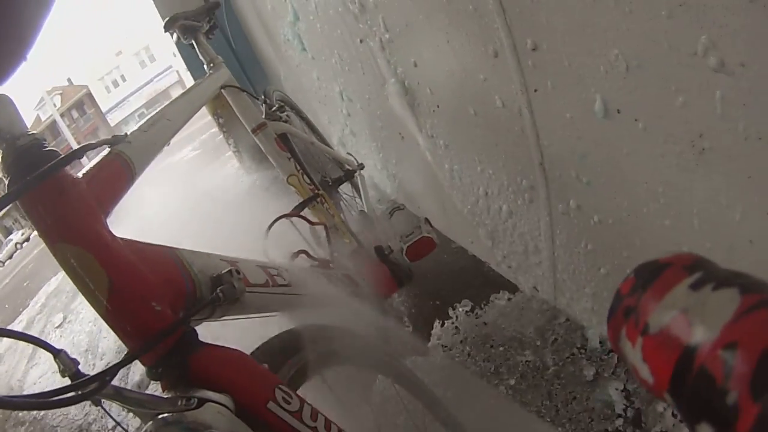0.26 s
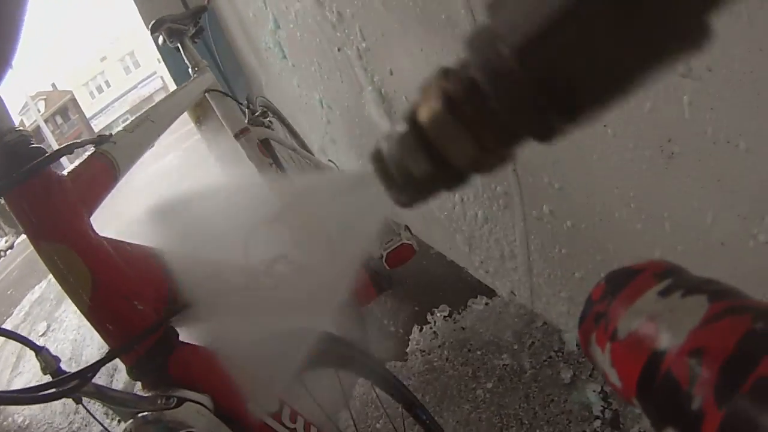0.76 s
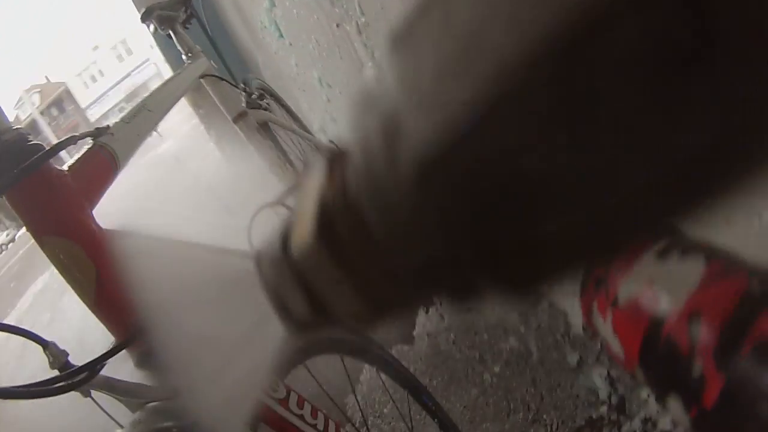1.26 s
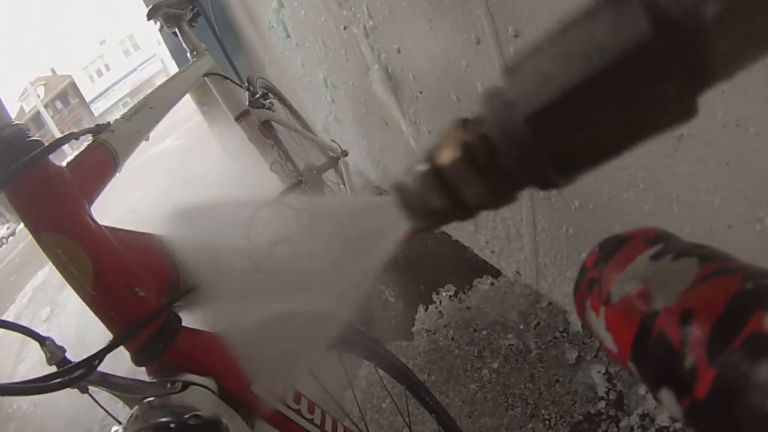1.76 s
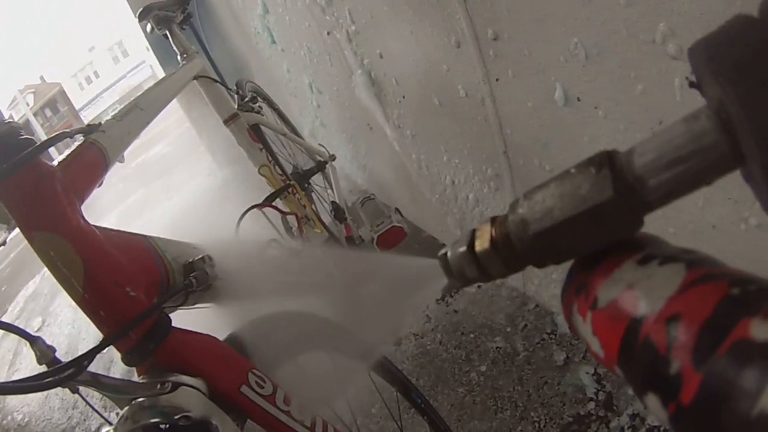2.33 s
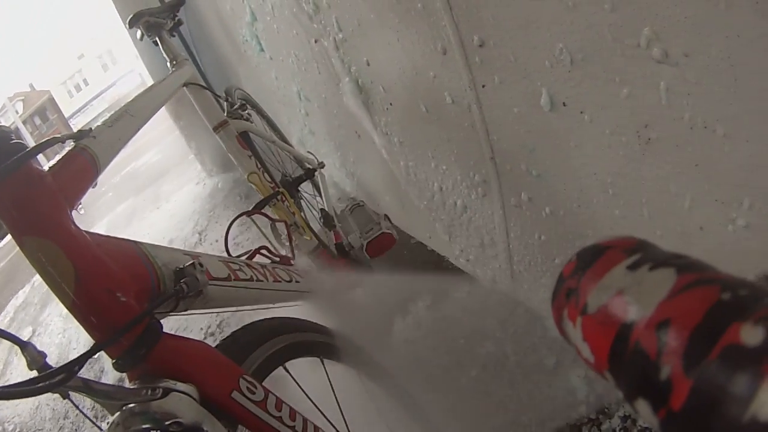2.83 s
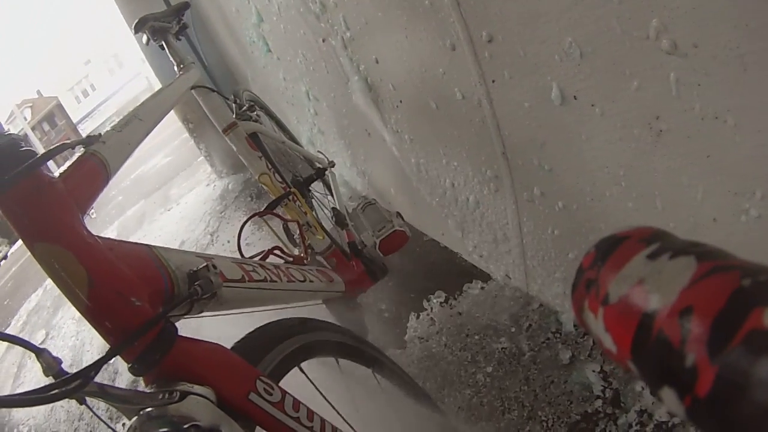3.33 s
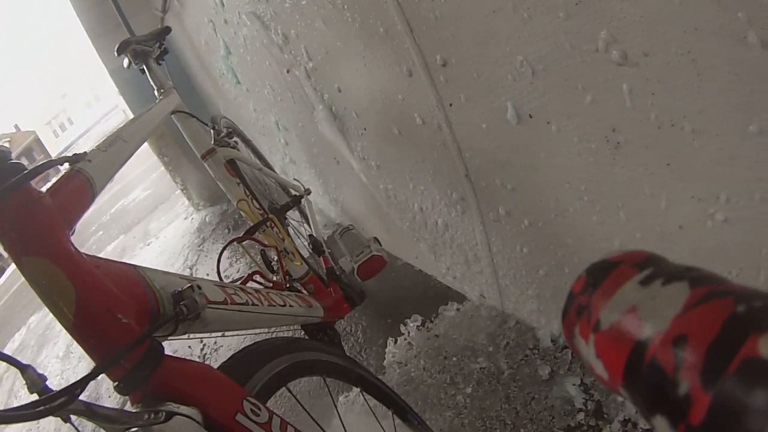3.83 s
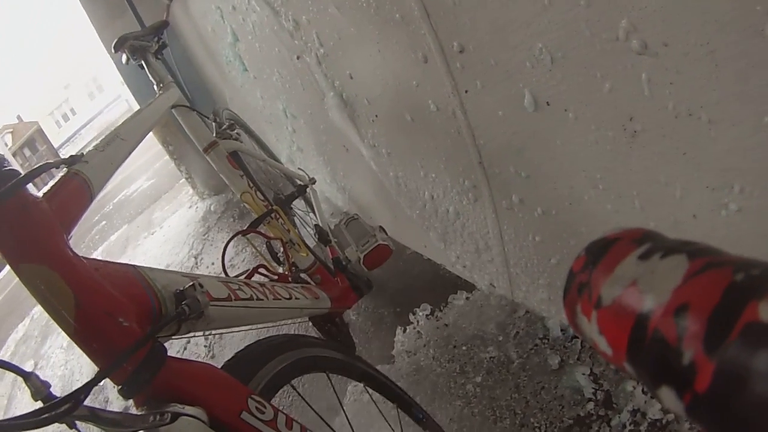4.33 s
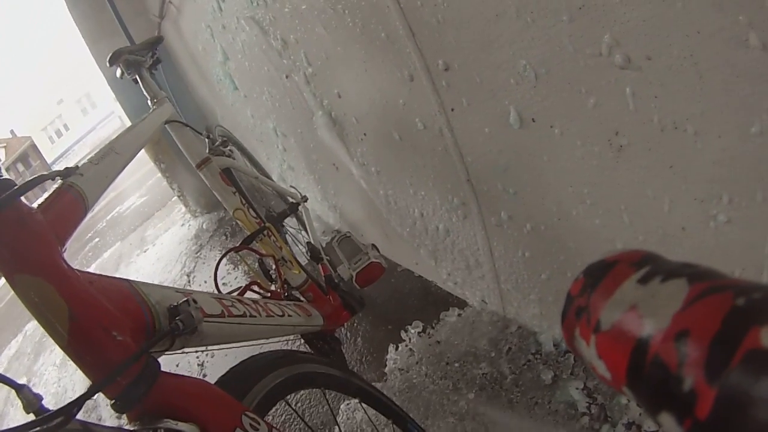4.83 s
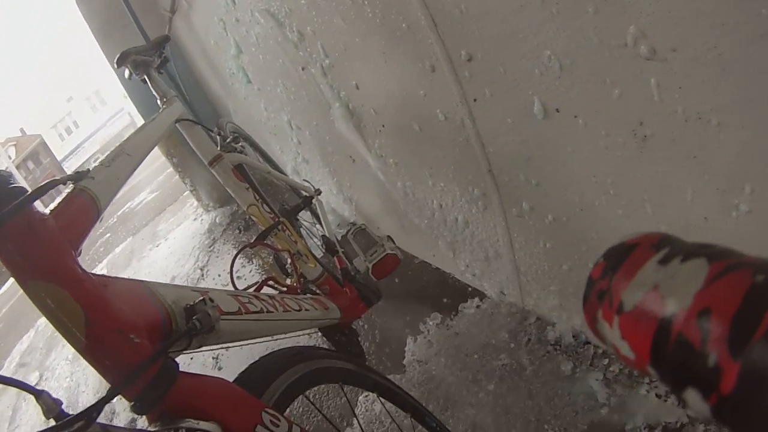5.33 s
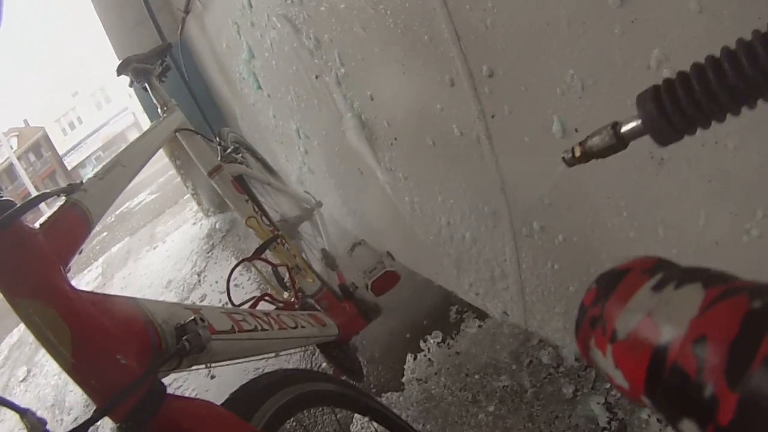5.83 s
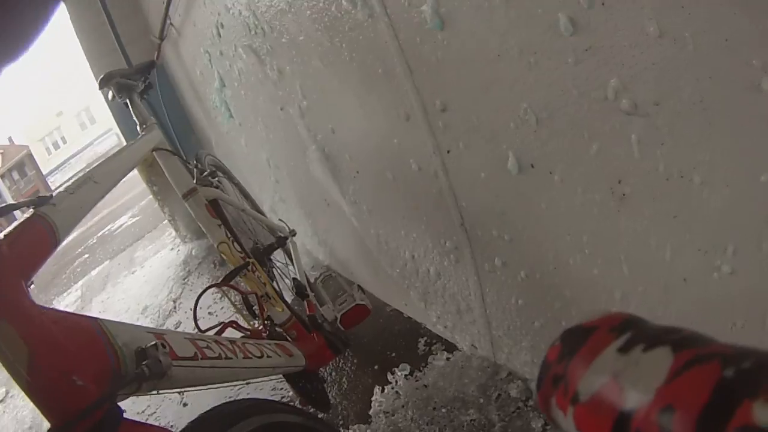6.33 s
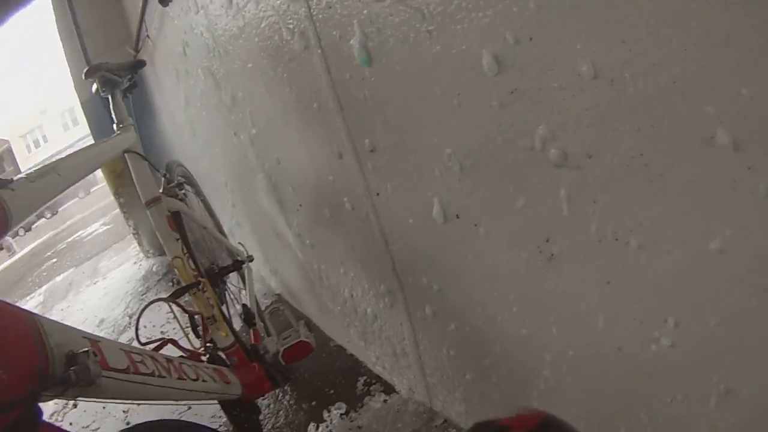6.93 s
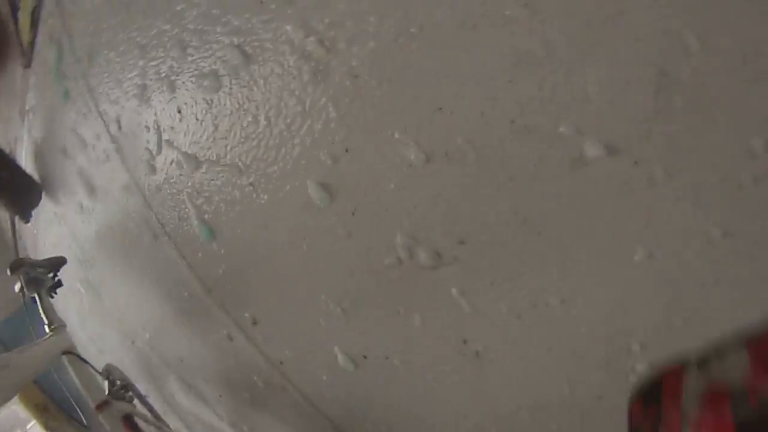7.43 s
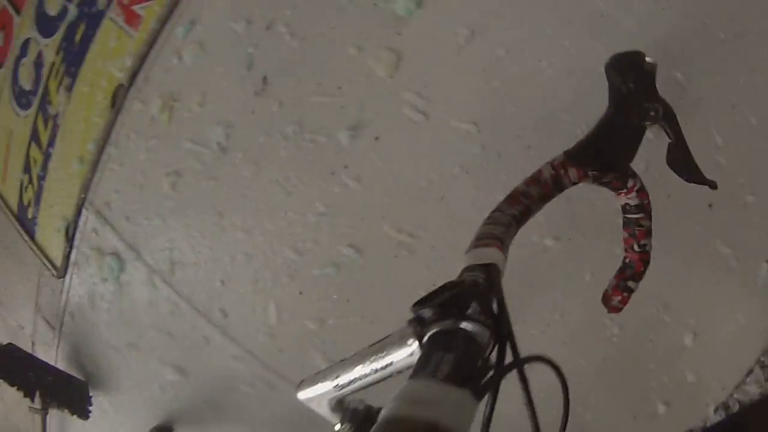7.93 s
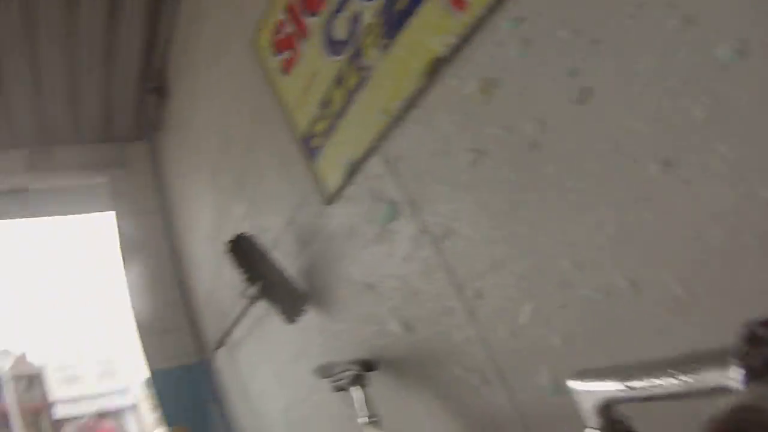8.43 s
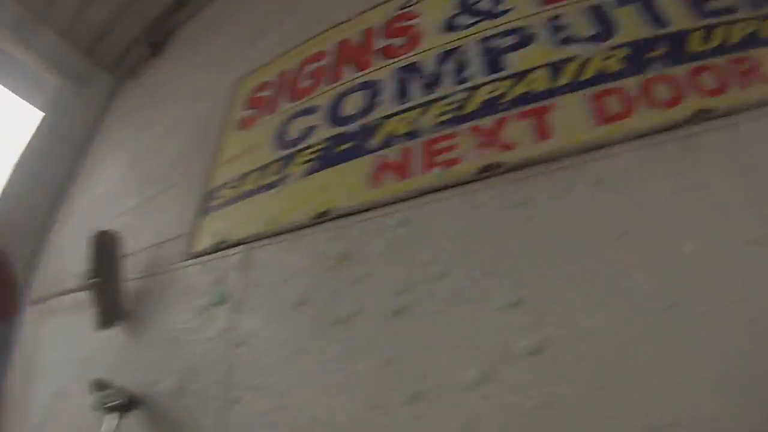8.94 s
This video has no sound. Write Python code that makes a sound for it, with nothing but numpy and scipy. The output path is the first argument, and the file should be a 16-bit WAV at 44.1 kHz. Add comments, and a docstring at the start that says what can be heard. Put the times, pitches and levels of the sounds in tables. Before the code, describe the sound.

From 0 s a close, loud pressure-water jet hisses and roars on a bicycle frame in a hard-walled wash bay, swelling as it sweeps across tubes. Hard, overloaded knocks on the camera case hit at about 0.7, 0.95, 1.3 and 1.7 s, with a milder one near 2.1 s; each big hit ducks the water, which creeps back. Around 2.6 s the roar thins, and from 3 s the jet hisses brighter and drums on the wheel, with a roaring surge at 3.2 s. At 5.16 s it shuts off sharply, leaving a short echo, low rumble, soft mist, thin rings and ticking drops. Small clicks come at 5.7 s. A hollow note glides upward, narrowing into a whistle around 6.8-7.5 s, then fades broader. Handling clacks cluster at 7.6-7.7, 8.15 and 8.4-8.9 s, the hardest near 8.6 s. After 8.7 s water and rumble are muffled and quieter.

```python
"""A pressure wand rinses a bicycle in a wash bay, close to a camera in a waterproof case on the handlebar.
First the jet, as turbulent noise, hisses and roars on the frame, then hisses and drums more on the wheel.
Knocks, as decaying modes, overload the microphone; its gain ducks and creeps back, over a low rumble.
When the trigger is let go, a soft mist with narrow rings, a hollow gliding note and drop ticks is left.
More knocks follow; at the end the camera is swung away, which shades the water and the rumble."""
import sys
import numpy as np
from scipy import signal
from scipy.fft import rfft, irfft
from scipy.io import wavfile
from scipy.ndimage import uniform_filter1d, minimum_filter1d

SR = 44100
rng = np.random.default_rng(int(sys.argv[2]) if len(sys.argv) > 2 else 0)


def master_out(mix):
    """Clip the mix to full scale and print it as 16-bit PCM to the path in sys.argv[1]."""
    frames = np.transpose(np.atleast_2d(mix))
    ceiling = np.clip(frames, -1, 1)
    pcm = np.round(ceiling * 32767).astype(np.int16)
    wavfile.write(sys.argv[1], SR, pcm)


N = 404838
TIME = np.arange(N) / SR
FREQ = np.fft.rfftfreq(N, 1 / SR)

# A swell's length, in every table, is the span between the points where it has fallen to 1/e.
# jet as the wand moves from the frame, past a gap, to the wheel, before its swells:
# (time [s], hiss level [dB], brightness [dB per octave], roar level [dB])
JET_SWEEP = [(0.1, -21, -0.2, -21), (0.5, -20.5, 0.5, -25), (0.8, -19.5, -0.1, -19.5),
             (2.48, -20.5, -0.5, -19.5), (2.62, -24, 1, -28), (3.0, -19.5, 1.1, -27.5),
             (3.5, -21, -0.3, -22.5), (4.55, -18.5, 0.1, -23.5), (5.1, -18, 0.7, -23)]
# swells of the jet, in roar, hiss and drumming; the one at 2.7 s only drums and hisses:
# (time [s], length [s], rise of roar [dB], rise of hiss [dB], rise of drumming [dB])
JET_SWELLS = [(0.0, 0.11, 1, 2.5, 2), (0.295, 0.16, 2, 3, -0.5), (0.674, 0.16, 5.5, 3, 1),
              (2.705, 0.32, 0, 1, 3), (3.23, 0.34, 10, 3, 0.5), (3.717, 0.19, 3, 1.5, 3.5),
              (4.1, 0.34, 3.5, 2.5, 3), (5.123, .1, 2.5, -0.5, 4)]
# power spectra of the jet's hiss on frame and wheel, its roar and its drumming:
# (frequency [Hz], density [dB per Hz])
FRAME_HISS_SPECTRUM = [(900, -28), (1400, -1.5), (1800, 3.5), (2300, -2), (2900, -1.5), (3700, -4),
                       (5100, 0), (6300, -3), (7500, -7), (10200, -9), (11200, -16), (12600, -18),
                       (15000, -22)]
WHEEL_HISS_SPECTRUM = [(900, 3), (1400, -2.5), (1800, 4), (2550, -5), (3250, 1), (4200, -3.5), (5100, -1.5),
                       (6500, -1), (7400, -5), (10200, -9), (11200, -14), (12600, -16), (15000, -22)]
ROAR_SPECTRUM = [(200, -28), (330, -4), (420, -1), (550, 2.1), (670, 1.5), (880, 3.5), (1080, 1),
                 (1350, -9.5), (2000, -39)]
DRUM_SPECTRUM = [(60, -14), (95, -10), (130, 3), (220, 1.5), (320, -1.5), (500, -11), (1000, -40)]
# bands that swell in the hiss as the fan of water sweeps over tubes and spokes:
# (time [s], length [s], frequency [Hz], width [Hz], level [dB])
SINGING_BANDS = [(.35, 0.35, 6400, 900, -27.5), (.64, 0.31, 5110, 500, -25), (1.09, 0.17, 5060, 450, -24),
                 (2.75, 0.24, 5060, 330, -28), (2.694, 0.4, 10200, 445, -34), (3.25, 0.64, 3260, 450, -29),
                 (3.253, .5, 1767, 350, -28), (4.1, 0.26, 6370, 550, -29), (4.2, 0.15, 5450, 400, -27)]
# low air noise of the bay: (time [s], level [dB])
RUMBLE_LEVEL = [(0.6, -40), (2.2, -43.5), (3.1, -40), (4.4, -43), (5.8, -39), (8.5, -39)]
# power spectra of the rumble and of the puffs: (frequency [Hz], density [dB per Hz])
RUMBLE_SPECTRUM = [(20, -7), (38, 3), (60, 3), (85, 5), (130, -15.5), (250, -7.5)]
PUFF_SPECTRUM = [(22, -4), (40, 2), (60, -8), (90, -22)]
# puffs of air that buffet the case: (time [s], length [s], level [dB])
AIR_PUFFS = [(5.88, .3, -37), (6.62, .16, -34.5)]
# knocks on the camera and the bicycle: (time [s], level [dB], main ring [Hz], t60 [s],
# second ring [Hz], its relative level [dB], relative level of the case's clack [dB])
KNOCK_EVENTS = [ (0.6889, 29.5, 720, 0.0082, 1310, -4, -14.5), (0.9332, 27, 1015, 0.0093, 1970, -3, -7),
                (0.97, 10, 870, 0.013, 2200, -6, -5), (1.3139, 28, 685, 0.0093, 2940, -6.5, -4.5),
                (1.7072, 13.5, 590, 0.011, 1190, -2, -11.5), (2.0635, 1.5, 816, 0.033, 950, -6, -8),
                (5.6986, -1.5, 1230, 0.016, 2020, -3, -18), (5.7050, -12, 1240, .018, 1890, 3, -14),
                (5.7240, -6, 1140, 0.017, 1900, -4, -17), (7.2530, -12, 839, 0.011, 1713, 0, -6),
                (7.5915, 8, 970, 0.016, 1500, -6, -3.5), (7.5959, -5, 5440, 0.029, 6570, 0, 8),
                (7.702, 7.5, 3300, 0.027, 990, -13, -5.5), (7.709, 7, 3190, 0.015, 1800, -11, -16),
                (7.717, 6, 3170, 0.013, 1770, -7, -18), (8.1492, 7.5, 5100, 0.011, 1610, -5, 2.5),
                (8.424, -4, 834, .013, 1700, -12, -14), (8.4942, -8.5, 860, 0.015, 1680, 4.5, -6),
                (8.6198, 20, 3520, 0.0055, 4960, -1.5, -7.5), (8.642, -11, 3520, .02, 4800, -2, -2),
                (8.6712, 23.5, 920, 0.011, 1940, -26, -15), (8.7290, 4.5, 1030, 0.01, 2730, -4, -8.5),
                (8.8580, -13, 996, 0.019, 3980, -14, -14), ]
# dull thumps through the handlebar: (time [s], level [dB], frequency [Hz], t60 [s])
THUMP_EVENTS = [(0.933, 1.5, 65, 0.06), (1.316, 7.5, 62, 0.035), (4.746, -8, 107.4, 0.14),
                (7.619, -14, 70, 0.074), (8.1507, -8, 70.5, 0.057)]
# modes of the waterproof case: (frequency [Hz], level [dB], t60 [s])
CASE_MODES = [(123, -27, 0.023), (1206, -9, 0.012), (1415, -9.5, 0.015), (1860, 0, 0.0058),
              (2270, -12, 0.023), (2690, -5, 0.0046), (3290, -3, 0.011), (4140, -7, 0.0046),
              (5100, -5, 0.005), (5700, -4, 0.004), (6850, -8, 0.0029), (8400, -14, 0.0066),
              (10160, -22, 0.0053), (12400, -22, .006)]
# idle mist before its trims: (time [s], hiss level [dB], splatter level [dB])
MIST_LEVEL = [(5.35, -24.5, -34), (5.8, -26, -30), (6.55, -25.5, -27), (7.05, -28.5, -31),
              (7.55, -29.5, -29), (7.95, -25, -26), (8.3, -28.5, -31.5), (8.6, -26, -26)]
# power spectra of the mist's hiss and splatter: (frequency [Hz], density [dB per Hz])
MIST_HISS_SPECTRUM = [(1500, -19), (2400, 2), (2800, -4), (3350, 3), (4000, -4.5), (5200, 1), (6600, -4),
                      (8000, -9.5), (10300, -8.5), (11600, -13.5), (13000, -24), (15000, -18)]
SPLATTER_SPECTRUM = [(90, -1), (200, -6), (300, -1.5), (420, -8), (620, -2.5), (850, 3), (1100, 0),
                     (1350, -3.5), (1700, -12), (2000, -13.5), (2700, -32), (5000, -31)]
# narrow resonances in the mist:
# (resting pitch [Hz], pitch under pressure [Hz], width [Hz], level relative to the hiss before focus [dB])
MIST_RESONANCES = [(5210, 5420, 83, -14), (6600, 7050, 540, -8.5), (7800, 7750, 110, -20.5),
                   (8900, 8920, 140, -17.5), (10260, 10750, 150, -21), (12650, 12700, 200, -25)]
# hollow note of the idling nozzle: (time [s], pitch [Hz], level before its trim [dB], focus [0-1])
HOLLOW_NOTE = [(5.3, 2033, -26, 0.18), (6.0, 2130, -25, 0.09), (6.45, 2178, -24, 0.06),
               (6.76, 2240, -25, 0.2), (6.82, 2365, -23.5, .45), (7.5, 2410, -24, 0.67),
               (7.7, 2342, -29.5, 0.07), (8.7, 2262, -27.5, 0)]

DRUM_DB = -11  # drumming relative to the hiss, before the swells
THUMP_OCTAVE_DB, THUMP_CLACK_DB = -5, -27  # a thump also rings an octave up and barely stirs the case
RELEASE_S, CLOSING_S = 5.16, 0.0033  # the trigger valve shuts; time constant of its closing
BLEED_S = 0.62  # the hose's spare pressure is down to 1/e this long after the valve shuts
RINGING_DB, RINGING_FOCUS_DB = -3.5, 14.5  # trim of the mist's rings, and their rise at full focus
DROPS_PER_S, DROPS_DB = 200, -11.5  # ticking drops; trim within the splatter
TURN_S, TURNING_S, SHADE_DB = 8.7, 0.059, -11.5  # the swinging camera shades its microphone
BAND_LIMIT_HZ = 15500


def amp(db):
    """Decibel law: twenty decibels make a tenfold amplitude."""
    return 10 ** (np.asarray(db) / 20)


def evened(x):
    """Normalization to unit root mean square."""
    return x / np.sqrt(np.mean(x ** 2) + 1e-20)


def curves(rows):
    """Linear interpolation in time of each column of a table."""
    s, *columns = np.transpose(rows)
    return [np.interp(TIME, s, c) for c in columns]


def swell(s, length):
    """Gaussian envelope: a smooth rise and fall around the time s."""
    return np.exp(-(2 * (TIME - s) / length) ** 2)


def drift(per_s):
    """Low-passed random fluctuation of unit size, with its corner at per_s hertz."""
    spectrum = rfft(rng.standard_normal(N))
    return evened(irfft(spectrum / (1 + (FREQ / per_s) ** 4), N))


def noise(spectrum, patchy_db, tilt_db=0):
    """Turbulent noise by spectral shaping, with passing patches and a tilt per octave that may move."""
    hz, t, z = signal.stft(rng.standard_normal(N), SR, nperseg=1024, noverlap=768)
    f, level = np.transpose(spectrum)
    octave = np.log2(hz + 1)
    shape = np.interp(octave, np.log2(f), level, left=level[0] - 22, right=level[-1] - 44)
    tilt = np.interp(t, TIME, tilt_db * np.ones(N))
    field = amp(shape[:, None] + np.maximum(octave, np.log2(f[0]))[:, None] * tilt)
    steady = field / np.linalg.norm(field, axis=0)  # the tilt leaves the power unchanged
    patches = uniform_filter1d(rng.standard_normal(z.shape), size=9, axis=0)
    patches = evened(uniform_filter1d(patches, size=22, axis=1))
    z *= steady * amp(patchy_db * patches)
    return evened(signal.istft(z, nperseg=1024, noverlap=768)[1][:N])


def whistle(hz, width):
    """Resonance driven by noise: a double pole whose centre follows the curve hz."""
    r = np.exp(-np.pi * width * np.sqrt(2) / SR)
    driving = rng.standard_normal(N) + 1j * rng.standard_normal(N)
    fuzz = signal.lfilter([1], [1, -2 * r, r * r], driving)
    phase = 2 * np.pi * np.cumsum(hz * np.ones(N)) / SR
    return evened((fuzz * np.exp(1j * phase)).real)


def jet():
    """Turbulence and impact noise: the nozzle hisses, the water roars on tubes and drums on the tyre."""
    hiss_db, bright_db, roar_db = curves(JET_SWEEP)
    rises = sum(np.outer(rises_db, swell(s, length)) for s, length, *rises_db in JET_SWELLS)
    roar_rise, hiss_rise, drum_rise = rises
    hiss_db, roar_db = hiss_db + hiss_rise, roar_db + roar_rise
    drum_db = hiss_db + DRUM_DB + drum_rise

    aim = np.interp(TIME, [2.55, 3.0], [0, np.pi / 2])  # the wand swings from the frame down to the wheel
    on_frame = noise(FRAME_HISS_SPECTRUM, patchy_db=1.5, tilt_db=bright_db)
    on_wheel = noise(WHEEL_HISS_SPECTRUM, patchy_db=0.7, tilt_db=bright_db)
    hiss = np.cos(aim) * on_frame + np.sin(aim) * on_wheel
    hiss *= amp(hiss_db + 0.57 * drift(per_s=31))

    # the roar is thinner on the wheel and fuller where it swells
    roar_tilt_db = 1.0 * np.sin(aim) - 0.23 * roar_rise
    roar = amp(roar_db + 0.75 * drift(per_s=50)) * noise(ROAR_SPECTRUM, patchy_db=1.9, tilt_db=roar_tilt_db)
    # the louder the roar, the higher the drumming
    drum_tilt_db = 0.29 * (roar_db + 25.5)
    drum = amp(drum_db + 0.9 * drift(per_s=6)) * noise(DRUM_SPECTRUM, patchy_db=1.4, tilt_db=drum_tilt_db)
    singing = sum(amp(db) * swell(s, length) * whistle(hz, width)
                  for s, length, hz, width, db in SINGING_BANDS)
    return hiss + roar + drum + singing


def bay(x, t60, top_hz):
    """Diffuse reverberation: hard walls return an exponentially decaying tail that has lost its top."""
    t = np.arange(SR) / SR
    tail = rng.standard_normal(SR) * amp(-60 * t / t60) * (t > .006)
    tail = signal.sosfilt(signal.butter(2, min(top_hz, SR / 3), fs=SR, output="sos"), tail)
    return signal.fftconvolve(x, tail / np.linalg.norm(tail))[:N]


def rumble():
    """Low-frequency flow noise: unsteady air fills the bay, and two deeper puffs buffet the case."""
    level_db, = curves(RUMBLE_LEVEL)
    air = amp(level_db + 1.7 * drift(per_s=2.3)) * noise(RUMBLE_SPECTRUM, patchy_db=0.0)
    puffs = sum(amp(db) * swell(s, length) for s, length, db in AIR_PUFFS)
    return air + puffs * noise(PUFF_SPECTRUM, patchy_db=0.5)


def add(mix, s, sound):
    """Superposition: a sound is summed into the mix from the time s."""
    part = mix[round(s * SR):][:len(sound)]
    part += sound[:len(part)]


def knocks():
    """Modal excitation: a blow rings two modes of the spot and, by brief gritty contact, the whole case."""
    out, t = np.zeros(N), np.arange(SR // 5) / SR
    case = sum((-1) ** k * amp(db - 60 * t / t60) * np.sin(2 * np.pi * hz * t)
               for k, (hz, db, t60) in enumerate(CASE_MODES))
    thumps = [(s, db, hz, t60, 2 * hz, THUMP_OCTAVE_DB, THUMP_CLACK_DB) for s, db, hz, t60 in THUMP_EVENTS]
    for s, db, hz, t60, second_hz, second_db, clack_db in KNOCK_EVENTS + thumps:
        swing = amp(-60 * t / t60) * (1 - np.exp(-50 * t / t60))  # long rings also build up more slowly
        ring = swing * (np.sin(2 * np.pi * hz * t) + amp(second_db) * np.sin(2 * np.pi * second_hz * t))
        # little is radiated below the main ring
        ring = signal.sosfilt(signal.butter(1, hz / 4, "high", fs=SR, output="sos"), ring)
        contact = 0.35 * rng.standard_normal(len(t)) * np.exp(-t / .002)
        contact[0] = 1
        clack = signal.fftconvolve(contact, case)[:len(t)]
        add(out, s, amp(db) * (ring + amp(clack_db) * clack / abs(clack).max()))
    return out


def drops():
    """Random impulses on damped resonances: scattered drops of all sizes, each a tick of a few cycles."""
    out, t, count = np.zeros(N), np.arange(SR // 100) / SR, 12
    for hz in np.geomspace(1400, 7000, count):
        falls = rng.random(N) < DROPS_PER_S / count / SR
        size = amp(3.4 * np.minimum(rng.exponential(1, N), 3)) * falls
        tick = np.sin(2 * np.pi * hz * t) * np.exp(-hz * t / 1.4)
        out += signal.oaconvolve(size, tick)[:N]
    return evened(out)


def mist():
    """Low-pressure flow noise with resonances: soft hiss, rings, a hollow note and splatter on the floor."""
    hiss_db, splatter_db = curves(MIST_LEVEL)
    note_hz, note_db, focus = curves(HOLLOW_NOTE)
    pressure = np.exp(-(np.maximum(TIME - RELEASE_S, 0) / BLEED_S) ** 2)
    ringing_db = RINGING_DB + RINGING_FOCUS_DB * focus
    # the microphone turns away from the nozzle (dB per octave)
    dulling_db = np.interp(TIME, [7.5, 8.8], [0, -1.7])
    hiss = amp(-1.2) * noise(MIST_HISS_SPECTRUM, patchy_db=2.2, tilt_db=dulling_db)

    # the rings settle to their resting pitch as the hose loses its pressure
    rings = np.zeros(N)
    for hz, high_hz, width, db in MIST_RESONANCES:
        ring_level = amp(db + ringing_db + 1.6 * drift(per_s=6.5))
        ring_hz = hz + (high_hz - hz) * pressure + 38 * drift(per_s=5)
        rings += ring_level * whistle(ring_hz, width)

    # the note is a broad band with a lower shoulder, or narrows to a whistle
    focus = np.clip(focus, 0, 1)
    broad = whistle(note_hz * .975, width=400) + amp(-2.5) * whistle(note_hz * .77, width=570)
    narrow = whistle(note_hz + 12 * drift(per_s=13.7), width=57)
    note = np.sqrt(1 - focus) * broad + np.sqrt(focus) * narrow

    splatter = amp(-1.67) * noise(SPLATTER_SPECTRUM, patchy_db=1.5) + amp(DROPS_DB) * drops()
    splatter *= amp(splatter_db + .5 * drift(per_s=40))
    return amp(hiss_db + 0.6 * drift(per_s=49)) * (hiss + rings) + amp(note_db - 1.13) * note + splatter


def scene():
    """Superposition of airborne and structure-borne paths: jet, then mist; knocks mostly through the case."""
    valve = .5 - .5 * np.tanh((TIME - RELEASE_S) / CLOSING_S)  # 1 open, 0 shut
    water, blows = valve * jet(), knocks()
    wet = amp(-17.0) * bay(water, t60=1.0, top_hz=3200) + amp(-41) * bay(blows, t60=0.97, top_hz=4000)
    turned = .5 + .5 * np.tanh((TIME - TURN_S) / TURNING_S)
    airborne = water + np.sqrt(1 - valve) * mist() + rumble()
    mono = amp(SHADE_DB * turned) * airborne + blows + wet
    return np.array([mono, mono])


def limiter(x, threshold_db, slope, deepest_db, recovery_db_per_s):
    """Dynamic compression: gain falls just ahead of each peak and comes back at a steady rate."""
    peak_db = 20 * np.log10(abs(x).max(0) + 1e-9)
    ahead = -minimum_filter1d(-peak_db, size=300)
    over_db = np.clip(slope * (ahead - threshold_db), 0, deepest_db)
    fall = TIME * recovery_db_per_s
    held_db = np.maximum.accumulate(over_db + fall) - fall
    return x * amp(-uniform_filter1d(held_db, size=60))


def record(dry):
    """Compression and saturation: slow gain control, quick limiter, overload of the rest, band limit."""
    levelled = limiter(dry, threshold_db=0.1, slope=0.89, deepest_db=8.5, recovery_db_per_s=9.0)
    limited = limiter(levelled, threshold_db=-1.0, slope=0.5, deepest_db=18, recovery_db_per_s=83)
    overloaded = np.clip(limited, -1, 1)
    low_pass = signal.firwin(511, BAND_LIMIT_HZ, window=("kaiser", 9), fs=SR)
    return signal.oaconvolve(overloaded, low_pass[None], "same")


dry = scene()
out = record(dry)
master_out(out)
```